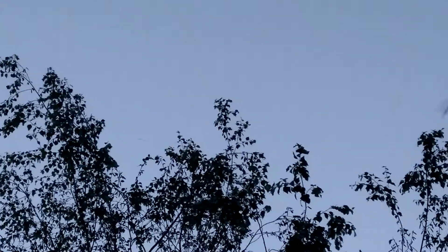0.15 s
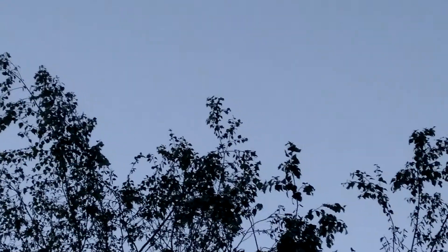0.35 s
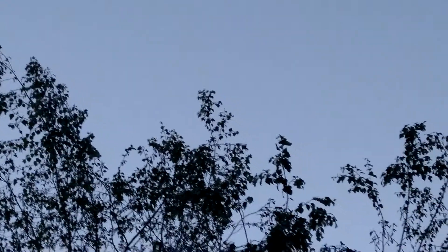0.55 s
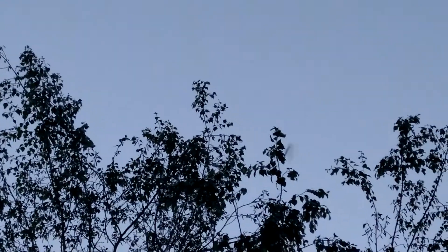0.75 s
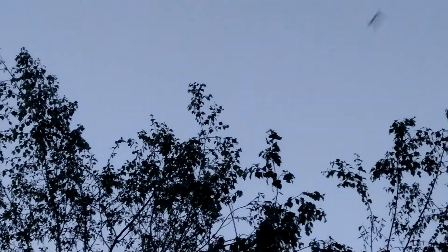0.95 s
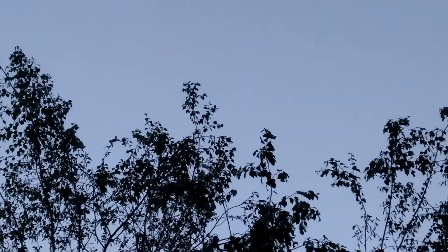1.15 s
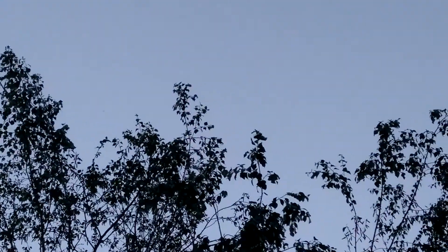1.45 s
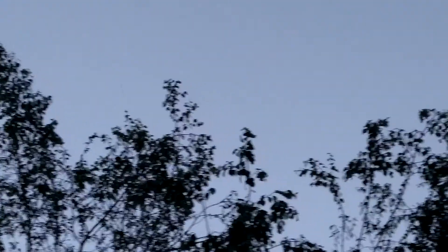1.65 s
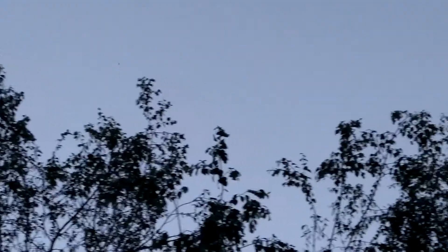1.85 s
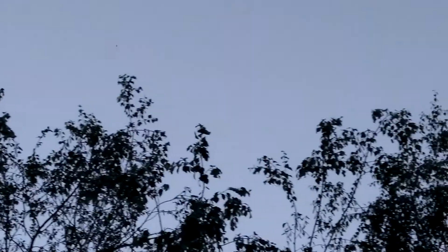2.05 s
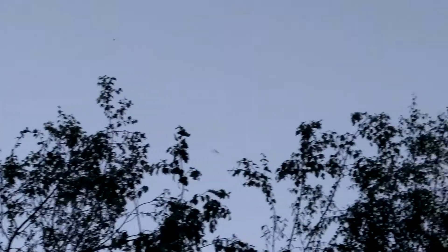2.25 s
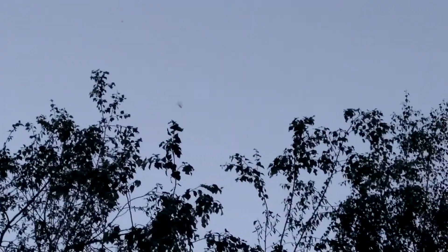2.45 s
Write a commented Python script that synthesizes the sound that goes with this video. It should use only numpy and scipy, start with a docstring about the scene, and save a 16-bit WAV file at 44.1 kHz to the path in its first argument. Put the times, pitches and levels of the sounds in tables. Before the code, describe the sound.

Shrill, fluttering swift screams pass overhead, echoing and receding into a quiet evening

```python
"""Swifts scream as they sweep over treetops at dusk: rising whistles roughened by a fast flutter, several overlapping.
Later and fainter screams blur as if farther off; walls echo them as a decaying noise tail.
Under them lie far screams as band noise, a thin songbird whistle, town and microphone hiss, a low throb,
wind puffs, faint low tones and two ringing ticks."""
import sys
import numpy as np
from scipy import signal
from scipy.fft import rfft, irfft, next_fast_len
from scipy.io import wavfile
from scipy.ndimage import uniform_filter1d, map_coordinates

SR = 44100
rng = np.random.default_rng(int(sys.argv[2]) if len(sys.argv) > 2 else 0)


def transcribe(u):
    """Save the signal u as a 16-bit wav file named by the first command-line argument.

    u: samples, shape (n,) or (channels, n), limited to [-1, 1]; the rate is SR.
    q: integer samples, one column per channel.
    """
    v = np.clip(np.atleast_2d(u).T, -1, 1)
    q = np.round(v * 32767).astype(np.int16)
    wavfile.write(sys.argv[1], SR, q)


N = 114660
T = np.arange(N) / SR
EDGE_S = 0.012


def amp(db):
    """dB to gain."""
    return 10 ** (np.asarray(db) / 20)


def unit(x):
    """Scaled to rms 1."""
    return x / np.sqrt(np.mean(np.abs(x) ** 2) + 1e-20)


def along(points, hz):
    """(Hz, value) points interpolated on a log frequency axis."""
    f, v = np.transpose(points)
    return np.interp(np.log(hz + 1), np.log(f + 1), v)


def curves(rows, t=T):
    """One interpolated curve for each column after the time."""
    s, *cols = np.transpose(rows)
    return [np.interp(t, s, c) for c in cols]


def wobble(rate, size=N):
    """Smooth random curve of rms 1, rate knots a second; zero once its size / 8 knots run out."""
    knots = rng.standard_normal(size // 8 + 4)
    return unit(map_coordinates(knots, [np.arange(size) * rate / SR], order=2, prefilter=False))


def grit(rate, size):
    """Complex random curve: sidebands that smear a tone."""
    return (wobble(rate, size) + 1j * wobble(rate, size)) / np.sqrt(2)


def filtered(x, response):
    """x times a response of frequency."""
    m = next_fast_len(N + SR // 2)
    return irfft(rfft(x, m) * response(np.fft.rfftfreq(m, 1 / SR)), m)[..., :N]


def rush(spectrum, alike):
    """Stereo noise of rms 1; mid and side shares set the left-right correlation at each frequency."""
    # shut below 1.2 times the first frequency
    shut = [(spectrum[0][0] * 1.2, -120)] + list(spectrum)

    def mid_side(hz):
        turn = np.arccos(np.clip(along(alike, hz), -1, 1)) / 2
        return amp(along(shut, hz)) * [np.cos(turn), np.sin(turn)]

    mid, side = filtered(rng.standard_normal((2, N)), mid_side)
    return unit(np.array([mid + side, mid - side]))


def background():
    """Far town and microphone hiss as shaped noise; a low throb as a wavering tone plus narrow noise."""
    # Each row: frequency in Hz, relative density in dB per Hz.
    air_colour = [(53, 5.5), (90, -1), (204, -0.5), (292, -8.5), (339, -0.5), (419, -10.5), (966, -9),
                  (2190, -14), (4500, -9), (5850, -25), (9900, -120)]
    # Each row: frequency in Hz, left-right correlation.
    air_alike = [(60, 0.56), (180, 0.96), (550, 0.48), (1650, -0.47), (4970, -0.08), (15000, 0.26)]
    # Air swell. Each row: time in seconds, level in dB.
    air_swell = [(0.0, -70), (0.35, -69), (0.72, -66.5), (0.98, -68.5), (1.35, -70.5), (2.21, -71),
                 (2.6, -71)]
    # Low throb. Each row: time in seconds, level in dB.
    throb_level = [(0.0, -88), (0.04, -67), (0.3, -86), (0.32, -70), (0.72, -62.5), (0.99, -70.5),
                   (1.05, -58.5), (1.13, -85), (1.53, -82), (1.67, -70.5), (1.89, -79.5), (2.3, -72),
                   (2.48, -61.5), (2.6, -60.5)]
    throb_hz, throb_width_hz, left_db = 57, 22, 2.5

    throb_db, = curves(throb_level)
    peak = lambda hz: 1 / (1 + ((hz - throb_hz) / throb_width_hz) ** 4)
    tone = np.sin(2 * np.pi * np.cumsum(throb_hz + 4 * wobble(5.5)) / SR)
    low_noise = filtered(rush([(28, 0)], [(20, 0.85)]), peak)
    throb = unit(unit(tone) + .5 * unit(low_noise))
    air_db = curves(air_swell)[0] + 0.47 * wobble(4.2)
    air = amp(air_db) * rush(list(air_colour) + [(6000, -60)], air_alike)  # flat above 6 kHz
    return (air + amp(throb_db) * throb) * amp([[left_db / 2], [-left_db / 2]])


def flock():
    """A blur of far screams as coloured noise, swelling with the near ones."""
    # Each row: time in seconds, level in dB of the 7.3-9.5 kHz band ahead of trim_db.
    flock_level = [(0.0, -108), (0.17, -65), (0.28, -67), (0.48, -53.5), (0.62, -51.5), (0.71, -48),
                   (1.09, -60.5), (1.56, -59), (1.69, -63), (1.8, -72), (2.05, -71), (2.37, -74),
                   (2.49, -71.5), (2.6, -83)]
    # Each row: frequency in Hz, relative density in dB per Hz.
    flock_colour = [(1470, -47), (2500, -36), (4080, -61.5), (4640, -103), (4780, -65), (5320, -18.5),
                    (6390, 3.5), (7510, -15), (11500, -30), (12300, -12), (12600, -56), (15500, -108)]
    trim_db, lurch_db = -3.5, 1.5

    db, = curves(flock_level)
    hiss = rush(flock_colour, [(5000, 0.023)])
    band = filtered(hiss, lambda hz: (hz > 7300) & (hz < 9500))
    return amp(db + trim_db + lurch_db * wobble(8.36)) * hiss / np.std(band)


def puffs():
    """Wind puffs on the microphone: lowpassed noise in bell-shaped swells."""
    # Each row: centre in seconds, length in seconds, level in dB, top in Hz.
    puff_rows = [(0.068, 0.024, -68, 230), (0.667, 0.049, -59, 745)]
    out = np.zeros((2, N))
    for s, length_s, db, top_hz in puff_rows:
        noise = rush([(60, 0)], [(200, 0.97), (1000, 0.22)])
        noise = unit(filtered(noise, lambda hz: 1 / (1 + hz / top_hz) ** 2))
        out += amp(db) * np.exp(-((T - s) / length_s) ** 2) * noise
    return out


def hoots():
    """Short faint low tones, unsteady in pitch and level, stronger on the left."""
    # Each row: start in seconds, length in seconds, pitch in Hz, level in dB ahead of the left-right offsets.
    hoot_rows = [(0.932, 0.092, 381.6, -64), (1.145, 0.033, 930, -70.5), (2.325, 0.044, 355, -71)]
    out = np.zeros((2, N))
    for s, length_s, hz, db in hoot_rows:
        shape = np.clip(np.minimum(T - s, s + length_s - T) / 0.0087, 0, 1)
        level = amp(db + 4.1 * wobble(78.3) + [[2], [-3]])
        tone = np.sin(2 * np.pi * np.cumsum(hz + 35 * wobble(120)) / SR)
        out += level * shape * tone
    return out


def ticks():
    """Two ticks of decaying roughened modes; the first adds a noise click, which the second's spent knots lack."""
    # Each row: start in seconds, level in dB ahead of the click and ring offsets.
    tick_rows = [(2.387, -59.5), (2.479, -55.5)]
    # Ringing modes. Each row: frequency in Hz, relative level in dB, t60 in seconds.
    modes = [(623, -2.5, 0.11), (1267, -4, 0.097), (2180, -7, 0.14)]
    rough_rad = 1.2
    out = np.zeros((2, N))
    for s, db in tick_rows:
        t = np.maximum(T - s, 0)
        out += amp(db - 6.5 - 60 * t / 0.016) * (T > s) * wobble(5900)
        ring = 0
        for hz, mode_db, t60_s in modes:
            tone = np.sin(2 * np.pi * hz * t + rough_rad * wobble(600))
            ring = ring + amp(mode_db - 60 * t / t60_s) * tone * (T > s)
        out += amp(db - 9.5) * ring
    return out


def whistle():
    """A far songbird: one thin sine, wavering in pitch and level."""
    # Each row: time in seconds, pitch in Hz, level in dB.
    notes = [(2.44, 4120, -78), (2.462, 4200, -74), (2.484, 4070, -74), (2.5, 4286, -71),
             (2.516, 4380, -72), (2.544, 4340, -71), (2.562, 4200, -71), (2.58, 4150, -72),
             (2.6, 4280, -72)]
    waver_hz, break_db = 75, 3.5

    hz, db = curves(notes)
    tone = np.sin(2 * np.pi * np.cumsum(hz + waver_hz * wobble(250)) / SR)
    onset = np.clip((T - notes[0][0]) / EDGE_S, 0, 1)
    return onset * np.sqrt(2) * amp(db + break_db * wobble(160)) * tone


def scream(rows, hoarse):
    """A whistle fluttering in size and pitch, cleaner while it glides, with rasp, overtones, 1.5x and half pitch."""
    longest_s, attack_s = .52, .04
    flutter_hz, flutter_depth, flutter_swing_hz, flutter_wander = 258, .55, 120, .04
    pitch_jitter_hz, glide_rasp, clean_glide_hz_per_s = 32, .65, 5000
    rasp_hz, far_rasp_hz, rasp_share, most_rasp, alike_share = 449, 430, .4, .68, .3
    near_db, rasp_per_db, first_blur, recede_s = -24, .014, .15, .6
    lurch_db, skirt_db, skirt_hz, half_smear_hz = 1.5, -25, 1602, 927
    octave_pan_db, octave_smear, third_db = -9.5, 1, -12  # third re octave
    left_lag_s, lag_drift_s_per_s = .00031, .00005

    size = round(SR * longest_s)
    start_s, end_s = rows[0][0], rows[-1][0]
    t = start_s + np.arange(size) / SR
    hz, db, octave_db, pan_db, *between_db = curves(rows, t)

    # no fade where a scream meets either end of the scene
    fade_in = (t - start_s) * EDGE_S / attack_s + (start_s < .01)
    fade_out = end_s - t + (end_s > 2.59) + EDGE_S
    edge = np.clip(np.minimum(fade_in, fade_out) / EDGE_S, 0, 1)

    glide_hz_per_s = uniform_filter1d(np.gradient(hz) * SR, size=1300)
    rough = glide_rasp + (1 - glide_rasp) / (1 + (glide_hz_per_s / clean_glide_hz_per_s) ** 4)
    flutter_rate_hz = flutter_hz * (1 + flutter_wander * wobble(43.1, size))
    beat = 2 * np.pi * np.cumsum(flutter_rate_hz) / SR
    pitch_hz = hz + pitch_jitter_hz * wobble(155.05, size) + rough * flutter_swing_hz * np.cos(beat)
    phase = 2 * np.pi * np.cumsum(pitch_hz) / SR

    # fainter and later screams are more blurred
    faintness = np.clip(rasp_per_db * (near_db - db), 0, most_rasp - rasp_share)
    far = rough * np.clip(first_blur + t / recede_s, 0, 1) * faintness

    def blur():
        near_grit = np.sqrt(1 - 2 * far) * grit(2 * rasp_hz, size)
        return near_grit + np.sqrt(2 * far) * grit(2 * far_rasp_hz, size)

    shared_rasp = blur()
    share = np.minimum(curves(hoarse, t)[0] * (rasp_share * rough + far), 1)
    swell = amp(lurch_db * wobble(42.0, size))
    ears = []
    for side in (1, -1):  # left, right
        rasp = np.sqrt(alike_share) * shared_rasp + np.sqrt(1 - alike_share) * blur()
        flutter = 1 + rough * flutter_depth * np.cos(beat)
        body = np.sqrt(1 - share) * flutter + np.sqrt(share) * rasp
        body = body + amp(skirt_db) * grit(2 * skirt_hz, size)
        voice = amp(db + side * pan_db / 2) * unit(swell * body) * np.exp(1j * phase)
        third = amp(third_db) * np.exp(3j * phase) * (3 * hz < SR / 2.2)
        overtones = np.exp(2j * phase) + third
        smear = 1 + octave_smear * grit(900, size)
        voice = voice + amp(octave_db + side * octave_pan_db / 2) * smear * overtones
        for level_db, ratio in zip(between_db, (1.5, .5)):
            voice = voice + amp(level_db) * grit(2 * half_smear_hz, size) * np.exp(1j * ratio * phase)
        ears.append(np.sqrt(2) * edge * voice.real)

    lag = round((left_lag_s + lag_drift_s_per_s * start_s) * SR)
    ears[0] = np.pad(ears[0], (lag, 0))[:size]
    out = np.zeros((2, N + size))
    out[:, round(start_s * SR):][:, :size] = ears
    return out[:, :N]


def swifts():
    """All screams, plus wall echo by convolution with a delayed decaying noise tail."""
    # Leading screams, one list each. Each row: time in seconds, pitch in Hz, level in dB, octave level in dB,
    # left over right in dB, level at 1.5 times the pitch in dB, level at half the pitch in dB.
    lead = [
        [(0.0, 4095, -82, -84, 7, -67, -88), (0.02, 4520, -54.5, -72, 17, -77, -76),
         (0.084, 4683, -61, -73, 14, -71, -101), (0.15, 5120, -33, -51.5, 0.5, -79, -75),
         (0.2, 5476, -35.5, -53.5, 6.5, -84, -86), (0.24, 5600, -38.5, -62.5, 8.5, -66, -82),
         (0.3, 5507, -44, -78, 14.5, -74, -99), (0.39, 5535, -44.5, -81, 15.5, -106, -70.5)],
        [(0.38, 5450, -46, -60.5, -3, -91, -67), (0.445, 6066, -29, -45.5, 14.5, -54, -72),
         (0.515, 6530, -20.5, -49, 8, -47, -63.5), (0.6, 6630, -26, -48, 11, -51, -63.5),
         (0.635, 6536, -28.5, -52, 13, -52, -66), (0.7, 6500, -23, -49, 11, -55, -74),
         (0.72, 6537, -34.5, -70, 10, -66, -68), (0.8, 6700, -37.5, -65, 21, -65, -64),
         (0.88, 6750, -50, -94, 14, -54.5, -64)],
        [(0.9, 5347, -48, -51, 9, -67, -68.5), (1.04, 6100, -34.5, -55.5, 10.5, -56.5, -71),
         (1.09, 6275, -40, -64, 11.5, -60, -91), (1.148, 6273, -41, -82, 7, -68, -104),
         (1.185, 6220, -45, -106, 12, -62, -88), (1.22, 6430, -63, -88, 3, -70, -102),
         (1.27, 6700, -56, -140, 4, -58, -110)],
        [(1.26, 6116, -41.5, -98, 14, -56, -95), (1.31, 6230, -41.5, -69, 12.5, -64, -96),
         (1.372, 6153, -48, -119, 15.5, -68, -104), (1.436, 6367, -47, -127, 15, -62, -76),
         (1.504, 6465, -57.5, -130, 18.5, -78, -68), (1.54, 6405, -45, -126, 22, -74, -86),
         (1.63, 6630, -64.5, -130, 11, -62, -63.5)],
        [(1.6, 6200, -42, -77, 4, -71, -89), (1.702, 6370, -39, -131, 6.5, -64, -65.5),
         (1.762, 6326, -44.5, -124, 14.5, -69, -67.5), (1.8, 6240, -68, -129, 0, -63, -74),
         (1.84, 6347, -50, -126, 21, -62, -71), (1.894, 6180, -60, -134, -10, -72.5, -72.5),
         (1.95, 6050, -56, -101, 3, -74, -83)],
        [(1.94, 6160, -66, -99, -3, -70, -69), (2.02, 6200, -48.5, -105, 0.5, -72.5, -76),
         (2.058, 6150, -53, -135, 8.5, -82, -90), (2.106, 6320, -79, -135, 14, -104, -103),
         (2.14, 6200, -81, -130, 16, -95, -108)],
        [(2.15, 5680, -51, -100, 8, -74, -78), (2.188, 5960, -45.5, -68, 3, -67, -104),
         (2.26, 6225, -47.5, -64, 7, -61, -99), (2.298, 6265, -47, -65, 14.5, -69, -104),
         (2.39, 6355, -58, -101, 6, -76, -100), (2.45, 6220, -56.5, -102, 9, -87, -101)],
        [(2.43, 5850, -64, -105, 10, -83, -91), (2.5, 5800, -53.5, -100, 4, -72.5, -88),
         (2.555, 5770, -49.5, -84, 5, -96, -104), (2.6, 5880, -56, -103, -3, -97, -88)],
    ]
    # Fainter screams, one list each. Each row: time in seconds, pitch in Hz, level in dB,
    # octave level in dB, left over right in dB.
    lower = [
        [(.405, 4500, -36, -56, 7), (.46, 5077, -35.5, -52, 6.5), (.5, 5430, -39.5, -50.5, 1),
         (.6, 5680, -36, -52, 11), (.72, 5830, -40.5, -61, 3)],
        [(.71, 5520, -46, -51.5, 3), (.8, 5417, -39, -52, 5), (.93, 5665, -53, -73, 11.5)],
        [(1.26, 5000, -57, -53, -4), (1.31, 5440, -50.5, -60, 7), (1.4, 5690, -62, -63.5, -4),
         (1.48, 5430, -75.5, -62, 27), (1.58, 5130, -64.5, -69.5, -12)],
        [(1.57, 5550, -54.5, -63, 3), (1.67, 5546, -47.5, -70.5, 3), (1.78, 5840, -77, -63, -10)],
        [(1.93, 5250, -60.5, -68, -1), (2.03, 5180, -59.5, -85, 4), (2.1, 5540, -70, -86, 10)],
        [(2.16, 5100, -66, -77, -4), (2.26, 5180, -59.5, -103, 10), (2.33, 5560, -68, -110, -1),
         (2.47, 5720, -75, -113, 6)],
        [(2.47, 5120, -67, -101, 12), (2.6, 5120, -67, -98, 14)],
        [(0, 5175, -56.5, -96, 1.5), (.08, 5174, -45.5, -88, 7.5), (.14, 5190, -53, -76, -21)],
        [(0, 5840, -59.5, -101, 14), (.08, 6050, -63.5, -83, 25), (.16, 6480, -76, -69, 3)],
        [(.33, 3764, -52.5, -86, 3), (.5, 4270, -55, -64, -1)],
        [(.16, 6600, -52, -81, 10), (.19, 6900, -59, -81, 22), (.26, 6560, -62, -71, 6)],
    ]
    # Hoarseness of the leading screams. Each row: time in seconds, rasp multiplier (0 clear).
    lead_hoarse = [(.1, .3), (.2, .6), (.4, 1), (.52, .6), (.7, .5), (.9, 1.3), (1.03, .5), (1.2, .5),
                   (1.27, 1.4), (1.46, 1.3), (1.51, .15), (1.59, .15), (1.63, 1.4), (1.72, .9), (1.8, 1.3),
                   (2.14, 1.3), (2.28, .7), (2.45, 1.1)]
    # The same for the fainter screams. Each row: time in seconds, rasp multiplier (0 clear).
    lower_hoarse = [(.42, .3), (.55, 1.4), (1.9, 1.4), (2, .6)]
    echo_db, echo_t60_s, echo_delay_s = -7, 0.53, 0.024

    birds = sum(scream(rows, lead_hoarse) for rows in lead)
    birds = birds + sum(scream(rows, lower_hoarse) for rows in lower)
    t = np.arange(SR // 2) / SR
    tail = rng.standard_normal((2, len(t))) * amp(-60 * t / echo_t60_s) * (t > echo_delay_s)
    echo = signal.fftconvolve(birds, tail / np.linalg.norm(tail[0]), axes=1)[:, :N]
    return birds + amp(echo_db) * echo


def scene():
    """Birds over the quiet evening."""
    return background() + flock() + puffs() + hoots() + ticks() + whistle() + swifts()


def record(dry):
    """Microphone colour and band limit."""
    # Each row: frequency in Hz, gain in dB.
    mic = [(3800, -6), (4600, -2), (5000, 1.5), (6500, 0.5), (7800, 5), (13000, -5), (14000, -4),
           (15500, -9)]
    top_hz = 15700
    return filtered(dry, lambda hz: amp(along([(2000, 0.024)] + mic, hz)) * (hz < top_hz))


dry = scene()
out = record(dry)
transcribe(out)
```